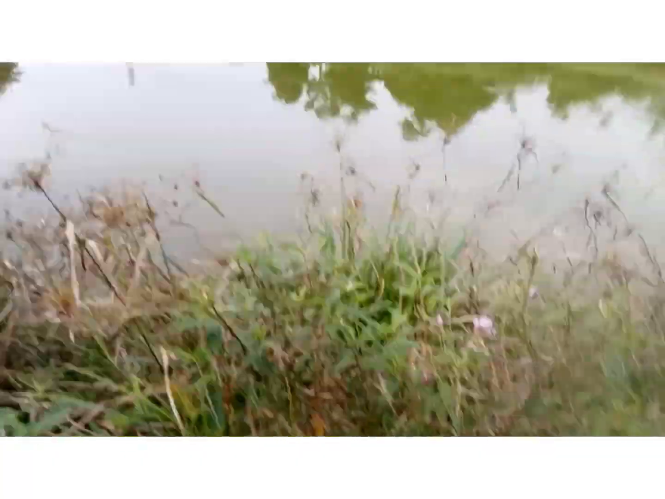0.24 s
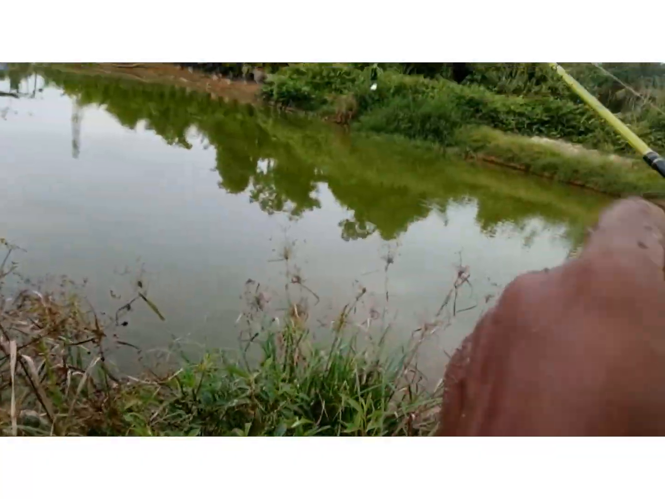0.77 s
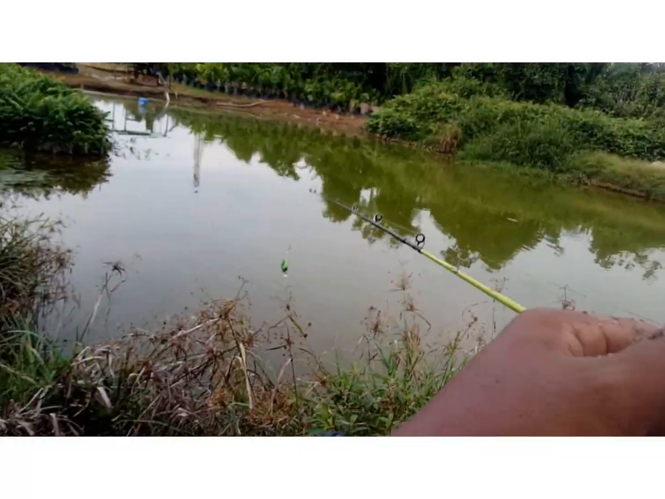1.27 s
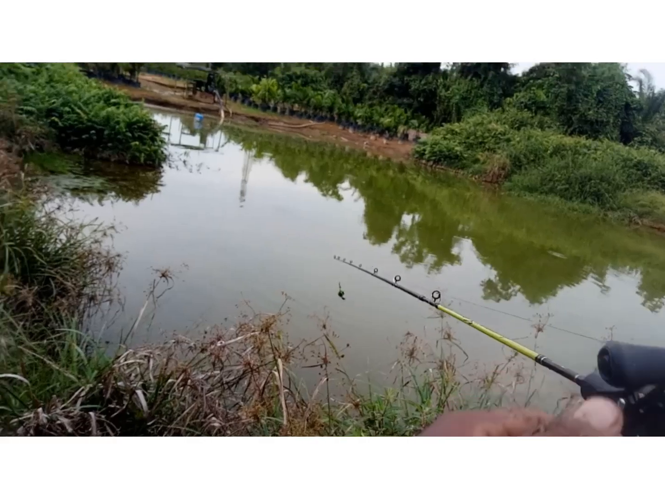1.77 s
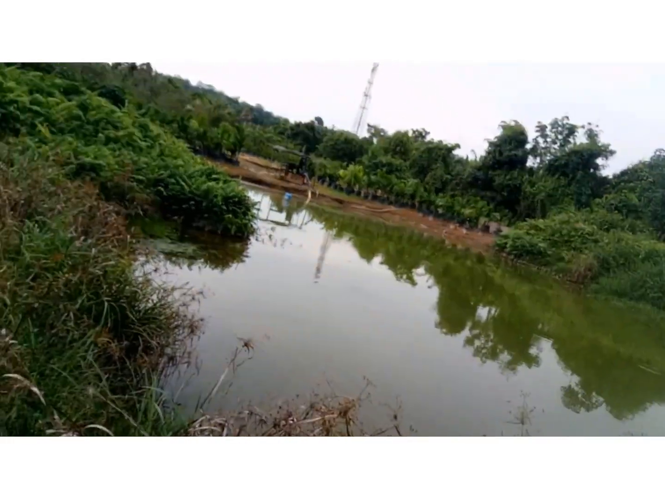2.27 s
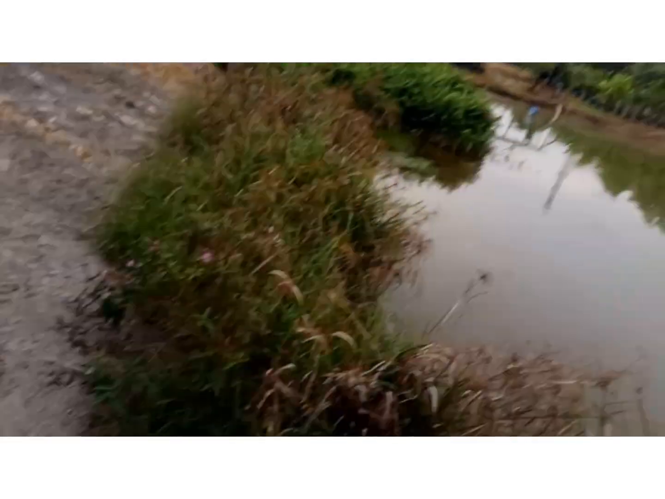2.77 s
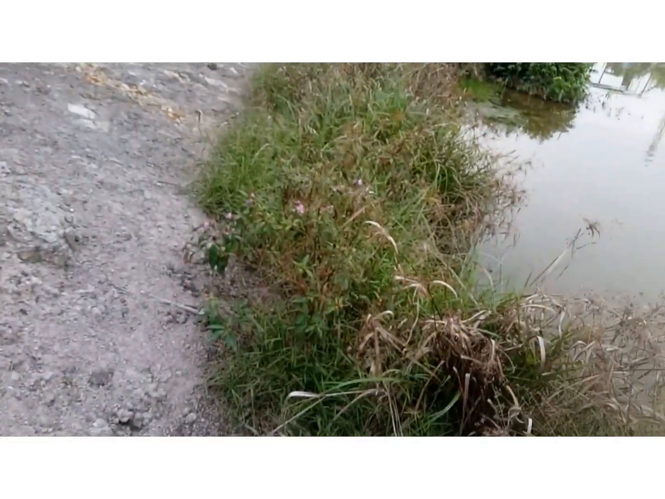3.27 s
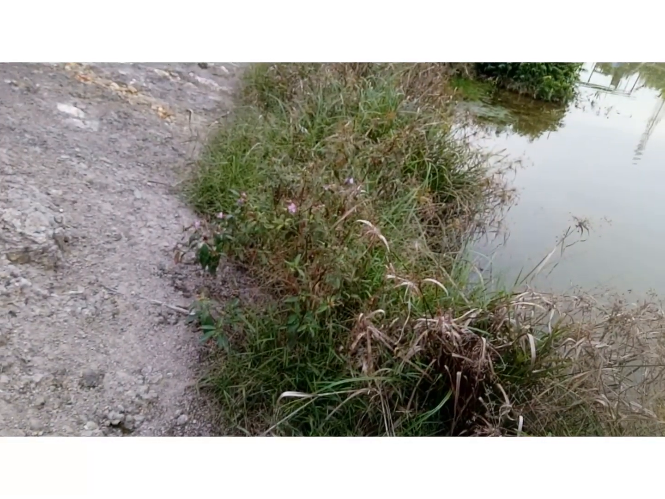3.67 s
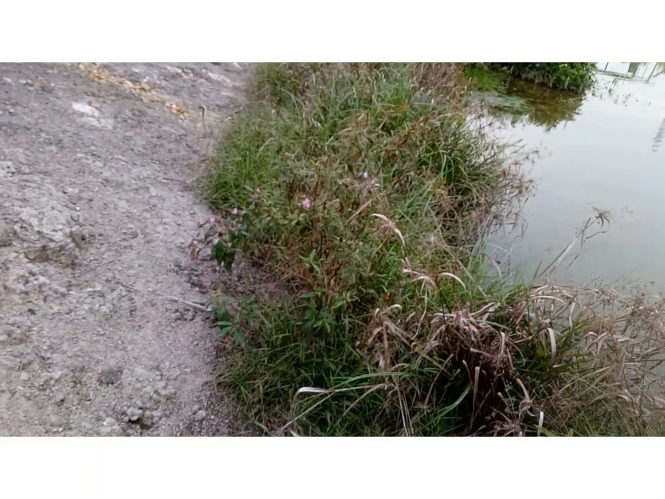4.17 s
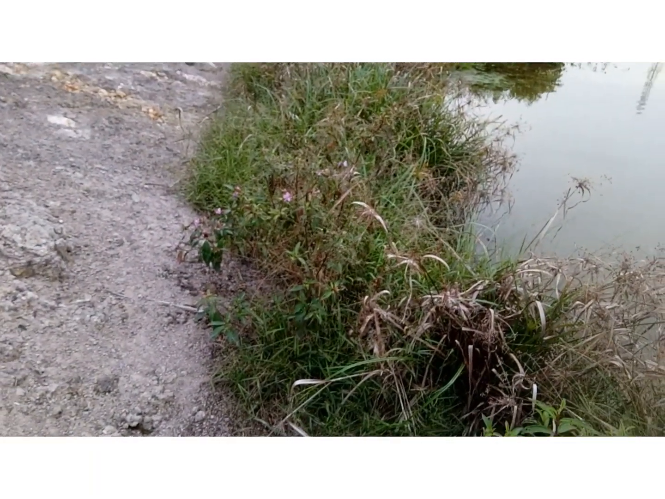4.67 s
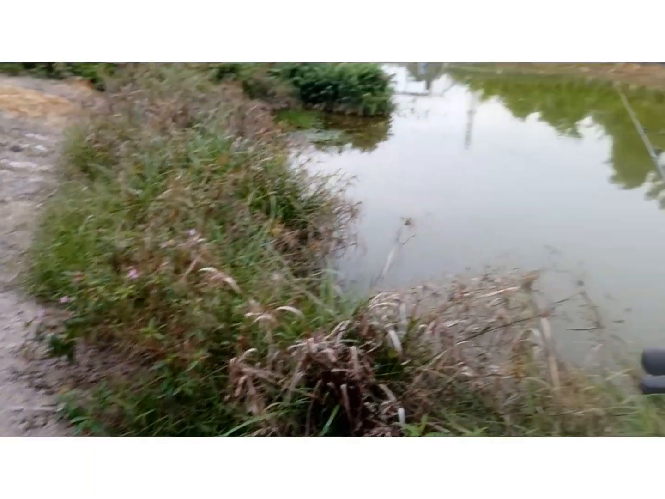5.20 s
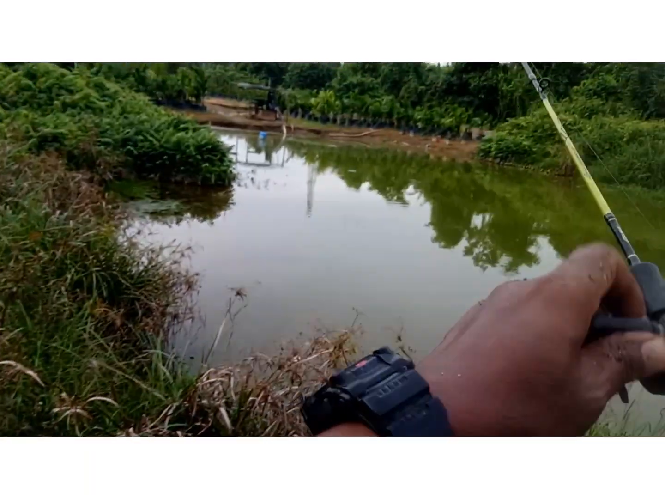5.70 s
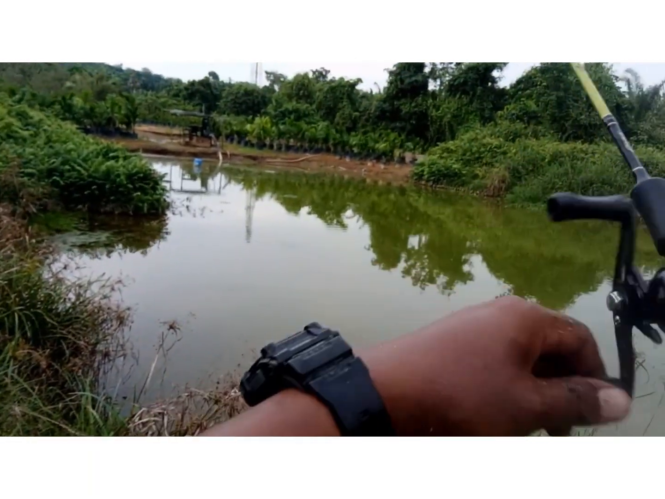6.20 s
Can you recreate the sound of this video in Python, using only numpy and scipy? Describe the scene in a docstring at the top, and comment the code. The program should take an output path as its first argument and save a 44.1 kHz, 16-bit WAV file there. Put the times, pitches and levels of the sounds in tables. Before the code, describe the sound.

Handling thuds and reel clicks, a quiet pause, a sharp casting swish with whirring spool, then reel handle snapping into gear beside an insect-filled pond.

```python
"""Casting a fishing reel from a pond bank

An angler frees a baitcasting spool with a click and casts; the handle later snaps into gear and winds.
Contacts excite damped resonances, the swish is shaped noise, and the whirr has harmonics of the turning rate.
Bumps and rubs on a hand-held camera are short thuds and friction noise, mostly early on.
Insects drone as narrow noise, birds whistle gliding tones with echoes, and a light breeze is low noise."""
import sys
import numpy as np
from scipy import signal
from scipy.fft import rfft, irfft
from scipy.io import wavfile

SR = 44100
rng = np.random.default_rng(int(sys.argv[2]) if len(sys.argv) > 2 else 0)


def wav_record(signal):
    """Record a signal, one row per channel, as 16-bit PCM in the file named by sys.argv[1]."""
    frames = np.transpose(np.atleast_2d(signal))
    bounded = np.clip(frames, -1, 1)
    # unit amplitude maps onto the largest positive 16-bit level
    quanta = np.round(bounded * 32767).astype(np.int16)
    wavfile.write(sys.argv[1], SR, quanta)


N = 284445
TIME = np.arange(N) / SR
RELEASE_S, SPIN_UP_S = 2.94, 0.075  # the spool starts to turn, and the time it takes to reach full speed


def cast():
    """Periodic excitation: rough spots repeat on every turn of the slowing spool, while the line hisses out."""
    # Resonances of spool and side plates. Each row: frequency in Hz, width in Hz, relative level in dB.
    spool_modes = [(1545, 330, 0), (2363, 210, 7), (2944, 203, 10), (3250, 350, 6.5), (3660, 460, 5.5),
                   (4480, 400, 0.5), (4900, 1700, -7)]
    # Resonances of the singing bearings. Each row: frequency in Hz, width in Hz, relative level in dB.
    bearing_modes = [(1620, 60, -6), (2840, 87, 7), (3120, 45, 7), (3340, 40, 3.5)]
    # Surges of line through the guides. Each row: start in seconds, hold in seconds, level in dB.
    line_surges = [(3.04, 0.11, -69), (3.266, .13, -67), (3.565, 0.02, -74.5), (3.753, 0.015, -71),
                   (4.03, 0.029, -78.5)]
    rise_db_per_s = 209
    half_order_db = -4  # alternate turns differ, which puts weaker lines between the main ones
    scrape_gain = 3.8  # scrape against the spool tones, before the body filters both

    speed = spool_speed()
    turns = np.cumsum(speed * (1 + 0.00888 * drift(60))) / SR
    drag = 0
    for order in np.arange(4, 20, 0.5):
        level_db = half_order_db * (order % 1 > 0) + 3 * drift(25)
        drag = drag + from_db(level_db) * np.sin(2 * np.pi * (order * turns + rng.random()))
    drag = rms_one(drag * (speed > 0))
    scrape = friction(500, grain_db=-3) * (1 + 0.5 * np.cos(2 * np.pi * turns))
    whirr = rms_one(band(resonate(drag + scrape_gain * scrape, spool_modes), 1165, 8800))
    whirr = whirr * from_db(1.5 * drift(45))  # loops of line leave unevenly

    # imbalance hums roughly at the turning rate and its first overtones, and fades soonest
    hum = 0
    for order in (1, 2, 3):
        phase = 2 * np.pi * order * turns + 0.5 * drift(120)
        hum = hum + from_db(3.5 * drift(90)) * np.sin(phase)
    hum = rms_one(hum)
    bearing = rms_one(band(resonate(scrape, bearing_modes), 1400, 3700, order=3))
    line = rms_one(band(friction(600, grain_db=2), 3800, 15000))

    # all three come in with the spin, hold and then fade at their own rates
    spun_s = RELEASE_S + SPIN_UP_S
    whirr = whirr * from_db(-50) * envelope(spun_s, 0.4, rise_db_per_s, fall_db_per_s=66)
    hum = hum * from_db(-57.5) * envelope(spun_s, 0.13, rise_db_per_s, fall_db_per_s=100)
    bearing = bearing * from_db(-57) * envelope(spun_s, 0.6, rise_db_per_s, fall_db_per_s=36)
    line = line * sum(from_db(db) * envelope(s, hold_s, rise_db_per_s=267, fall_db_per_s=208)
                      for s, hold_s, db in line_surges)

    # the reel's body sounds well to the left, its hiss nearer the middle
    body = place(band(whirr, 297, 3170, order=4) + bearing, pan_db=7.5, lag_s=0.000526)
    hiss = band(whirr, 3940, 12700, order=4)
    return body + place(hiss + hum + line, pan_db=4.0, lag_s=0.000528)


def spool_speed():
    """Turns per second under constant braking torque: a quick spin-up, then an even slowing to a stop."""
    top_turns_per_s, brake_turns_per_s2 = 338, 185
    since = TIME - RELEASE_S
    spin_up = np.sin(np.pi / 2 * np.clip(since / SPIN_UP_S, 0, 1))
    braked = top_turns_per_s - brake_turns_per_s2 * np.maximum(since - SPIN_UP_S, 0)
    return spin_up * np.maximum(braked, 0)


def swing():
    """Turbulent noise: the rod swishes through the air, and the line rasps as the lure yanks the spool."""
    # Spectrum of the swish. Each row: frequency in Hz, relative level in dB.
    swish_colour = [(180, -70.5), (300, -32.5), (590, -11.5), (674, -26.5), (863, -12), (1050, -23),
                    (1750, -14.5), (2440, -14.5), (3690, -10.5), (4280, -5), (4800, -23), (5850, -22.5),
                    (7750, -32.5), (9930, -34.5), (15500, -45)]
    # Spectrum of the line's rasp. Each row: frequency in Hz, relative level in dB.
    yank_colour = [(800, -24.5), (1250, -9), (1700, 0.5), (2300, -4.5), (3100, 2.5), (3800, 2),
                   (4400, -6.5), (4900, -15), (6000, -10.5), (7800, -33.5), (10000, -21.5), (15500, -35.5)]
    swish_s, swish_hold_s, swish_db = 2.962, 0.045, -38.5
    yank_s, yank_hold_s, yank_db = 2.975, 0.034, -33.5

    flutter = from_db(1.2 * drift(220))
    rush = from_db(swish_db) * colour(friction(2200, grain_db=-4), swish_colour)
    swish = 0
    for low_hz, high_hz, late_s in [(204, 1760, 0.012), (2200, 25000, 0.015)]:
        gain = envelope(swish_s + late_s, swish_hold_s, rise_db_per_s=300, fall_db_per_s=340)
        swish = swish + band(rush, low_hz, high_hz, order=3) * gain
    yank = from_db(yank_db) * envelope(yank_s, yank_hold_s, rise_db_per_s=2994, fall_db_per_s=893)
    rasp = yank * colour(friction(5000, grain_db=1.0), yank_colour)
    return place(flutter * (swish + rasp), pan_db=9.5, lag_s=0.000537)


def clicks():
    """Impulse response: a hard contact, a moment of rattle and a faint tail ring the reel's damped modes."""
    # Resonances of the reel. Each row: frequency in Hz, width in Hz, relative level in dB.
    reel_modes = [(430, 150, -9), (750, 91, -3), (1152.6, 130, -9.5), (1606, 130, -8), (2217, 300, 0.5),
                  (2690, 390, 3.5), (3807, 340, 6.5), (4500, 670, 5.5), (5770, 280, -3), (6990, 250, -12),
                  (8150, 1200, -20.5), (13600, 3000, -30)]
    # Contacts on reel, rod and camera. Each row: start in seconds, level in dB at 3-6 kHz over 4 ms,
    # body in dB relative to that, sharp edge in dB relative to that, left-right difference in dB,
    # lowest frequency in Hz, ring of the touched part in Hz, tail in dB relative to the first impulse,
    # rattle decay in seconds, damping by the hand as a factor on the mode widths.
    contacts = [(0.1675, -42.5, 9.5, -28, -1.5, 457, 1240, -38, 0.0035, 1.2),
                (0.4622, -50.5, -27, -37, 19, 700, 4200, -58, 0.00035, 0.75),
                (0.535, -49.5, -14, -20, -1.5, 700, 3640, -43, 0.0072, 1.4),
                (0.579, -43, -10, -11, 3, 1070, 4000, -42, 0.0091, 2),
                (0.595, -32.5, -14, -12, 2, 1060, 5560, -48, 0.0054, 2),
                (0.654, -43, -16, -7.5, -1.5, 700, 3570, -41, 0.0036, 0.93),
                (0.69, -28.5, -24, -19, 8, 1390, 4030, -48, 0.0042, 1),
                (0.7002, -40, -6.5, -16.5, -1.5, 700, 3500, -54.5, 0.0033, 1.2),
                (0.7093, -29, -2.5, -27, 17.5, 440, 4000, -55, .0002, 2.8),
                (0.736, -65, 4, -20, 10, 600, 3600, -51, .002, 1.5),
                (0.854, -61.5, 6.5, -24, 20, 486, 1730, -55, .003, 1),
                (2.1518, -36.5, -2.5, -54, -3.5, 770, 1670, -42, 0.0041, 1.4),
                (2.293, -59.5, -50.5, -53, -2, 700, 3800, -52, 0.0036, 1),
                (2.3737, -16, -20.5, -20.5, 6, 610, 4300, -54, 0.0013, 1.37),
                (2.918, -47, -25, -31, 5, 696, 4060, -46, 0.0026, 0.67),
                (2.9698, -35, -13, -37, 8, 900, 3570, -47, .0007, 0.73),
                (2.9733, -23.5, -18, -46, 10.5, 915, 3520, -54, 0.00058, 1.6),
                (3.01, -38.5, 7.5, -26, 8.5, 970, 1690, -28, .002, 1),
                (3.16, -38, -20, -20, -4, 880, 4040, -35, .01, 1.3),
                (3.289, -39, -10.5, -28, 10.5, 500, 4150, -39, 0.0033, 1.9),
                (3.535, -70, 10.5, -18.5, 8, 500, 910, -43, .003, 0.92),
                (5.738, -54, -17, -15, 6.5, 694, 4360, -46, .005, 0.56),
                (5.756, -51, -24, -8, -0.5, 700, 4500, -41, 0.0031, 1.6),
                (5.779, -63, -20, -15, 11, 694, 4370, -47, 0.0036, 0.83),
                (5.883, -61, -6, -18, 4.5, 696, 4100, -49.5, 0.0038, 1.5),
                (6.074, -35, 2.5, -16, 12, 720, 2250, -48, 0.0014, 0.77),
                (6.0777, -28.5, -6, -18, 3, 760, 5200, -51, 0.0037, 1.9),
                (6.0813, -18.5, -6, -12.5, 11, 377, 3980, -64, 0.0026, 0.83),
                (6.0864, -35, 8.5, -17, 5, 360, 2280, -62, .002, 0.57),
                (6.0878, -34, -3, -8, 0.5, 357, 2520, -39.5, 0.0052, 1.7),
                (6.398, -51, -2, -9, 14, 500, 3450, -28, 0.0024, 1.1)]
    # Parts left ringing. Each row: start in seconds, frequency in Hz, level in dB, decay in seconds.
    pings = [(0.71, 3450, -69, 0.14), (2.153, 2830, -46.5, 0.01), (2.294, 3780, -70.5, 0.078),
             (2.603, 2860, -52.5, .014), (2.943, 525, -46, 0.018), (2.944, 876, -48, 0.027),
             (6.422, 2670, -49, 0.02)]
    rattle_db, tail_s, uneven_db = -17, 0.053, 3
    part_width_hz, part_db = 230, 2.5
    lag_s_per_db = 0.000028  # the further left a contact, the later it reaches the right microphone

    out, t = np.zeros((2, N)), np.arange(SR // 6) / SR
    for s, main_db, low_db, top_db, pan_db, lowest_hz, part_hz, tail_db, rattle_s, damping in contacts:
        decay = from_db(rattle_db) * np.exp(-t / rattle_s) + from_db(tail_db) * np.exp(-t / tail_s)
        force = rng.standard_normal((2, len(t))) * decay
        force[:, 0] += 1
        # each contact has its own colour and damping
        modes = [(hz, width * damping, db + uneven_db * rng.standard_normal()) for hz, width, db in reel_modes]
        ring = resonate(force, modes + [(part_hz, part_width_hz * damping, part_db)])
        mid_db = -1.5 + 0.39 * low_db  # the 2-3 kHz ring grows with the body of a contact
        parts = [(lowest_hz, 1950, low_db), (1950, 3150, mid_db), (3150, 6400, 0), (7800, 15500, top_db)]
        tick = sum(from_db(db) * rms_one(band(ring, low, high, order=3)) for low, high, db in parts)
        # the energy of 4 ms, shared between the two sides
        scale = np.sqrt(0.004 / t[-1] * 2 / (from_db(pan_db) + from_db(-pan_db)))
        add(out, s, place(tick * scale * from_db(main_db), pan_db, lag_s=lag_s_per_db * pan_db))
    for s, hz, db, decay_s in pings:
        shape = (np.exp(-t / decay_s) - np.exp(-t / 0.0013)) * (1 - t / t[-1])
        add(out, s, from_db(db) * np.sin(2 * np.pi * hz * t) * shape)
    return out


def winding():
    """Gear meshing: teeth grind and whine at their meeting rate in a resonant housing; knocks and ticks join."""
    # Resonances of the housing. Each row: frequency in Hz, width in Hz, relative level in dB.
    gear_modes = [(310, 38, 0), (480, 510, 1.5), (870, 330, 3.5), (1105, 67, 5.5), (2246, 300, -0.5),
                  (2530, 620, -4.5), (3040, 330, -8)]
    # Rate at which the teeth meet, following the hand. Each row: time in seconds, rate in Hz.
    mesh_rate = [(0.72, 317.6), (0.86, 343), (6.08, 271.9), (6.13, 286.8), (6.2, 291.3), (6.25, 271.1),
                 (6.31, 287.9), (6.35, 293.3), (6.4, 281.7), (6.45, 259)]
    # Turns of the handle. Each row: start in seconds, hold in seconds, low grind in dB, high whine in dB.
    winds = [(0.72, 0.11, -63, -79), (6.091, .4, -53.5, -57.5)]
    # Soft knocks. Each row: start in seconds, level in dB before a common boost.
    gear_knocks = [(6.125, -60), (6.184, -42.5), (6.286, -45.5), (6.383, -43)]
    # Pawl ticks as the handle takes up its slack. Each row: start in seconds, level in dB.
    pawl_ticks = [(6.004, -48), (6.023, -46.5), (6.041, -48)]
    knock_boost_db, knock_hz, knock_s = 7, 560, 0.0057
    pawl_hz, pawl_s = 2800, 0.0033
    mesh_db, whine_db = -20, -8  # unfiltered teeth beside the grind, and whine beside the teeth

    teeth = friction(1900, grain_db=-2.0) * from_db(2.0 * drift(70))
    meetings = np.cumsum(np.interp(TIME, *np.transpose(mesh_rate)) * (1 + 0.00813 * drift(90))) / SR
    whine = 0
    for overtone in np.arange(2, 12):
        tone = np.sin(2 * np.pi * (overtone * meetings + rng.random()))
        whine = whine + from_db(5 * drift(22)) * tone
    housing = resonate(teeth + from_db(whine_db) * rms_one(whine), gear_modes)
    grind = rms_one(band(housing, 284, 1280, order=3)) + from_db(mesh_db) * rms_one(band(teeth, 370, 4600))
    sing = rms_one(band(housing, 1920, 4670, order=3))
    out = 0
    for s, hold_s, low_db, high_db in winds:
        gain = envelope(s, hold_s, rise_db_per_s=225, fall_db_per_s=695)
        out = out + (from_db(low_db) * grind + from_db(high_db) * sing) * gain

    t = np.arange(SR // 12) / SR
    knock = np.sin(2 * np.pi * knock_hz * t) * np.exp(-t / knock_s) * (1 - np.exp(-t / 0.00053))
    for s, db in gear_knocks:
        add(out, s, from_db(db + knock_boost_db) * knock)
    for s, db in pawl_ticks:
        add(out, s, from_db(db) * np.sin(2 * np.pi * pawl_hz * t) * np.exp(-t / pawl_s))
    return place(out, pan_db=6.5, lag_s=0.00043)


def handling():
    """Stick-slip friction: the hand bumps the camera with dull thuds and drags over its case and the rod grip."""
    # Soft bumps on the camera. Each row: centre in seconds, level in dB, pitch in Hz,
    # decay to either side in seconds, left-right difference in dB.
    bumps = [(0.1683, -18, 392, 0.0011, 8), (0.171, -25.5, 600, 0.0029, 5), (0.174, -32.5, 285, 0.0016, 6),
             (0.251, -31, 297, 0.0029, 5), (0.293, -40, 145, 0.0046, -23.5),
             (0.346, -42.5, 100.4, 0.0088, -28), (3.462, -50.5, 200, 0.0016, 3)]
    # Strokes of hand and sleeve. Each row: start in seconds, hold in seconds, dull part in dB, crisp part in dB.
    strokes = [(0.0, 0.03, -60, -59.5), (0.05, 0.12, -74, -66.5), (0.178, 0.095, -48, -60),
               (0.231, 0.072, -48, -49), (0.33, 0.03, -64, -69), (0.4, 0.078, -67, -68.5),
               (0.526, .006, -59.5, -63), (0.58, 0.0077, -59, -46), (0.618, 0.087, -65.5, -59.5),
               (0.714, 0.019, -59, -56), (0.756, 0.08, -72.5, -73), (2.858, 0.0099, -98, -76),
               (5.746, 0.028, -83, -67)]
    # Spectra of the dull and the crisp rub. Each row: frequency in Hz, relative level in dB.
    rub_dull, rub_crisp = [(41, -4), (70, 5.5), (145, 5), (224, -2.5), (327, -3.5), (627, -7), (800, -11),
                           (1900, -19.5), (2700, -30), (3600, -45), (5720, -120)], [(760, -17), (1300, -3), (1850, 6), (2420, 6), (3860, 11),
                                             (4700, 6.5), (5440, 2), (8850, -21), (14400, -36),
                                             (15500, -31.5)]
    scuff_db, scuff_s = -15, 0.0056

    out, t = np.zeros((2, N)), np.arange(-SR // 40, SR // 40) / SR
    dull, crisp = 0, 0
    for s, db, hz, length, pan_db in bumps:
        thud = from_db(db) * np.cos(2 * np.pi * hz * t) * np.exp(-np.abs(t / length))
        add(out, s + t[0], place(thud, pan_db, lag_s=0))
        # each bump scuffs the case
        dull = dull + from_db(db + scuff_db) * np.exp(-np.minimum(np.abs(TIME - s) / scuff_s, 20))
    for s, hold_s, dull_db, crisp_db in strokes:
        stroke = envelope(s, hold_s, rise_db_per_s=435, fall_db_per_s=468.5)
        dull = np.hypot(dull, from_db(dull_db) * stroke)
        crisp = np.hypot(crisp, from_db(crisp_db) * stroke)
    catching = from_db(1.93 * drift(109))  # skin sticks and slides
    dull_rub = dull * colour(friction(500, grain_db=-3.0), rub_dull)
    crisp_rub = crisp * colour(friction(300, grain_db=1), rub_crisp)
    out += place(catching * dull_rub, pan_db=7.5, lag_s=0)
    return out + place(catching * crisp_rub, pan_db=2.0, lag_s=-0.00017)


def birds():
    """Reverberation: gliding whistles trailed by echoes from the trees; a hidden bird is nearly all echo."""
    # Bird notes. Each row: start in seconds, length in seconds, start frequency in Hz, end frequency in Hz,
    # upward arch in Hz, level in dB before distance loss, direct sound in relative dB before screening.
    bird_notes = [(0.122, 0.075, 5850, 3980, 150, -55.5, 8), (0.741, 0.045, 4820, 3570, 2, -56.5, 4),
                  (0.855, 0.068, 5580, 5340, -1, -62, -10), (0.865, 0.115, 5340, 3400, 404, -61, 9.5),
                  (1.172, 0.07, 2590, 2555, 2, -75.5, 2), (1.434, 0.046, 5460, 3360, 195, -56.5, -4),
                  (1.739, 0.025, 5200, 3660, 3, -53.5, 8.5), (1.805, 0.058, 5350, 5180, 447, -71, 9),
                  (1.86, 0.029, 5700, 5200, -80, -65.5, 14.5), (2.632, 0.11, 5450, 4420, 5, -67, -8),
                  (4.356, 0.069, 6090, 5130, -3, -65.5, -7), (4.458, .11, 5610, 4560, 201.5, -72, -3),
                  (5.454, 0.078, 6390, 3110, -1, -54.5, 6.5)]
    distance_db = -2.5
    screen_db = -6  # leaves screen the direct path
    echo_db, echo_s = 1, 0.042
    waver = 0.022  # share of the pitch
    fall_db_per_octave = 19.5  # a note fades as it falls

    direct, calls = np.zeros((2, N)), np.zeros((2, N))
    for s, length, start_hz, end_hz, arch_hz, db, direct_db in bird_notes:
        size = int(length * SR)
        glide = np.geomspace(start_hz, end_hz, size) + arch_hz * np.sin(np.linspace(0, np.pi, size))
        hz = glide * (1 + waver * drift(300)[:size])
        level_db = 2.4 * drift(134.1)[:size] + fall_db_per_octave * np.log2(glide / start_hz)
        shape = signal.windows.tukey(size, 0.5) * from_db(level_db)
        note = from_db(db + distance_db) * np.sin(2 * np.pi * np.cumsum(hz) / SR) * shape
        add(calls, s, note)
        add(direct, s, note * from_db(direct_db + screen_db))
    t = np.arange(SR // 2) / SR
    trees = rng.standard_normal((2, len(t))) * np.exp(-t / (2 * echo_s))
    trees /= np.sqrt(np.sum(trees ** 2) / 2)
    return direct + from_db(echo_db) * signal.fftconvolve(calls, trees, axes=1)[:, :N]


def trills():
    """Amplitude-modulated narrow-band noise: the buzz of a nearer insect swells and fades in separate calls."""
    # Trills. Each row: start of full level in seconds, hold in seconds, level in dB.
    trill_calls = [(1.013, 0.042, -99), (1.49, 0.084, -79.5), (2.675, 0.053, -67), (3.69, 0.29, -71.5),
                   (4.805, 0.25, -80.5), (5.351, 0.092, -83)]
    centre_hz, width_hz, edge_db_per_s = 4667, 400, 118.5
    swell = sum(from_db(db) * envelope(s, hold_s, edge_db_per_s, edge_db_per_s) for s, hold_s, db in trill_calls)
    buzz = band(rng.standard_normal((2, N)), centre_hz - width_hz / 2, centre_hz + width_hz / 2)
    return swell * rms_one(buzz)


def pond():
    """Partly coherent noise: narrow insect choruses, distant hush, and breeze buffeting each microphone."""
    # Insect choruses. Each row: frequency in Hz, width in Hz, mid level in dB.
    insect_bands = [(4580, 287, -87), (5140, 540, -100), (6920, 440, -89.5), (8075, 565, -76),
                    (9630, 460, -93.5)]
    # Swell of the chorus, used relative to its median. Each row: time in seconds, level in dB.
    chorus_swell = [(0.0, -77.5), (0.86, -76.5), (1.2, -80), (1.76, -76), (2.3, -77.5), (2.59, -76.5),
                    (2.98, -77.5), (3.63, -79.5), (4.74, -81.5), (5.41, -75), (6.45, -76)]
    # Strength of the breeze on the microphones. Each row: time in seconds, level in dB before gusts.
    breeze_strength = [(0.42, -62.5), (0.67, -54.5), (0.72, -73), (0.79, -53), (0.9, -79), (2.96, -73),
                       (3.01, -50), (3.26, -65.5), (4.06, -59.5), (4.12, -70.5), (4.28, -54), (4.53, -79),
                       (5.86, -61), (6.03, -70.5), (6.16, -59), (6.23, -84), (6.37, -52), (6.45, -68)]
    # Spectra of the breeze and the low hush. Each row: frequency in Hz, relative level in dB.
    breeze_colour, air_colour = [(13, -45.5), (22, -5), (45, -5), (60, 7), (136, -11.5), (167, -27.5),
                                 (189, -18), (260, -20), (340, -48), (570, -120)], [(47, -46.5), (80, 1.5), (145, -8), (229, -15),
                                                        (260, -12), (416, -13.5), (664, -17.5),
                                                        (2540, -32.5), (3800, -57), (4940, -61.5),
                                                        (8360, -120)]
    hiss_colour = [(3000, 2.0), (4200, 3.5), (6200, -5.0), (10000, -12.0), (15500, -12.5)]  # (Hz, dB)
    hush_db, hiss_db, gusty_db = -68, -79, 5.5

    insects = 0
    for hz, width, db in insect_bands:
        drone = rms_one(band(air(2.2), hz - width / 2, hz + width / 2, order=3))
        insects = insects + from_db(db + 2.5 * drift(4.0)) * drone
    swell = np.interp(TIME, *np.transpose(chorus_swell))
    gusts_db = np.interp(TIME, *np.transpose(breeze_strength)) + gusty_db * drift(5.5)
    breeze = from_db(gusts_db) * colour(air(0.94), breeze_colour)
    hush = from_db(hush_db) * colour(air(1.1), air_colour)
    hiss = from_db(hiss_db) * colour(air(0.27), hiss_colour)
    far = insects * from_db(swell - np.median(swell)) + hush + hiss
    return place(far, pan_db=5.0, lag_s=0) + place(breeze, pan_db=9.0, lag_s=0)


def air(shared):
    """Partial coherence: stereo noise with a part common to both sides."""
    return rng.standard_normal((2, N)) + shared * rng.standard_normal(N)


def friction(per_s, grain_db):
    """Stick-slip noise of rms 1: hiss for each microphone with tiny shared slips of uneven size."""
    slips = (rng.random(N) < per_s / SR) * rng.standard_normal(N)
    return rms_one(rng.standard_normal((2, N)) + from_db(grain_db) * rms_one(slips))


def resonate(x, modes):
    """Modal superposition: parallel two-pole resonances of alternating sign."""
    out = 0
    for k, (hz, width, db) in enumerate(modes):
        r = np.exp(-np.pi * width / SR)  # pole radius
        zeros = np.array([1, 0, -1]) * (1 - r * r) / 2
        poles = [1, -2 * r * np.cos(2 * np.pi * hz / SR), r * r]
        out = out + (-1) ** k * from_db(db) * signal.lfilter(zeros, poles, x + 1e-18)
    return out


def colour(x, spectrum):
    """Spectral shaping: noise follows levels drawn over log frequency, with steep skirts; rms 1."""
    hz, db = np.transpose(spectrum)
    log_hz = np.log(np.fft.rfftfreq(2 * SR * 4, 1 / SR) + 1)
    beyond = np.abs(log_hz - np.clip(log_hz, np.log(hz[0]), np.log(hz[-1])))
    shape = from_db(np.interp(log_hz, np.log(hz), db) - 40 * beyond)
    return rms_one(irfft(rfft(x, 2 * (len(shape) - 1)) * shape)[..., :N])


def band(x, low_hz, high_hz, order=2):
    """Causal Butterworth band-pass."""
    edges = [low_hz, min(high_hz, 0.45 * SR)]
    return signal.sosfilt(signal.butter(order, edges, "band", fs=SR, output="sos"), x)


def envelope(start_s, hold_s, rise_db_per_s, fall_db_per_s):
    """Exponential growth and decay: a gain that reaches 1 at the start, holds and falls away."""
    early, late = np.maximum(start_s - TIME, 0), np.maximum(TIME - start_s - hold_s, 0)
    return from_db(-np.minimum(rise_db_per_s * early + fall_db_per_s * late, 140))


def drift(rate):
    """Slow random fluctuation: straight lines between normal values of spread 1, at a rate per second."""
    knots = rng.standard_normal(4000)
    return np.interp(TIME * rate, np.arange(len(knots)), knots)


def place(x, pan_db, lag_s):
    """Level and time differences: positive values make the left side louder and the right side later."""
    left, right = np.broadcast_to(x, (2, x.shape[-1]))
    at = np.arange(len(left))
    delayed = np.interp(at - lag_s * SR, at, right, left=0)
    return np.array([left * from_db(pan_db / 2), delayed * from_db(-pan_db / 2)])


def add(out, s, sound):
    """Superposition: mix a short sound in at a time in seconds."""
    at = max(round(s * SR), 0)
    out[..., at:at + sound.shape[-1]] += sound[..., :N - at]


def from_db(db):
    """Decibels to amplitude gain."""
    return 10 ** (np.asarray(db) / 20)


def rms_one(x):
    """Normalise the mean power, to an rms of 1."""
    return x / np.sqrt(np.mean(x ** 2) + 1e-20)


def scene():
    """Superposition of all that sounds on the bank."""
    return cast() + swing() + clicks() + winding() + handling() + birds() + trills() + pond()


def record(dry):
    """Low-pass filtering: a steep cut leaves the top 70 dB down from 16.7 kHz."""
    return signal.sosfilt(signal.cheby2(14, 70, 16700, fs=SR, output="sos"), dry)


dry = scene()
out = record(dry)
wav_record(out)
```